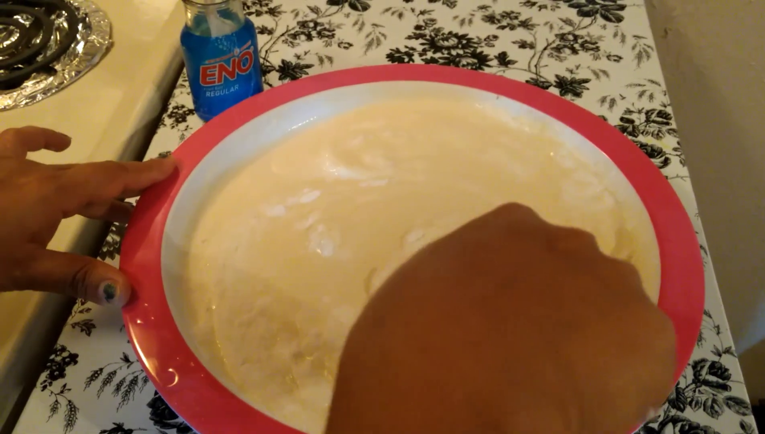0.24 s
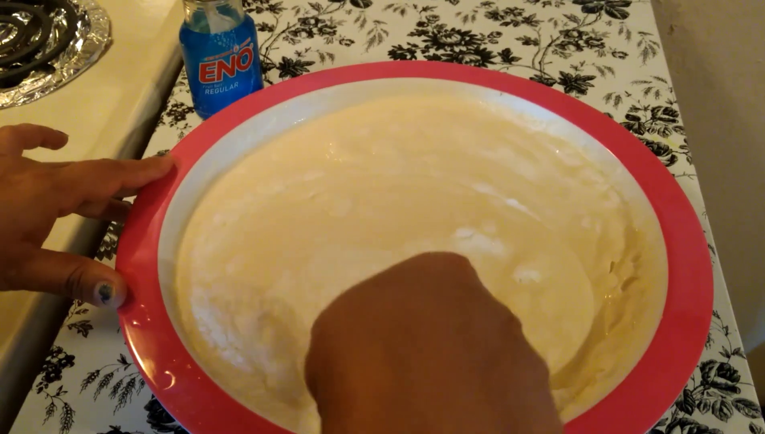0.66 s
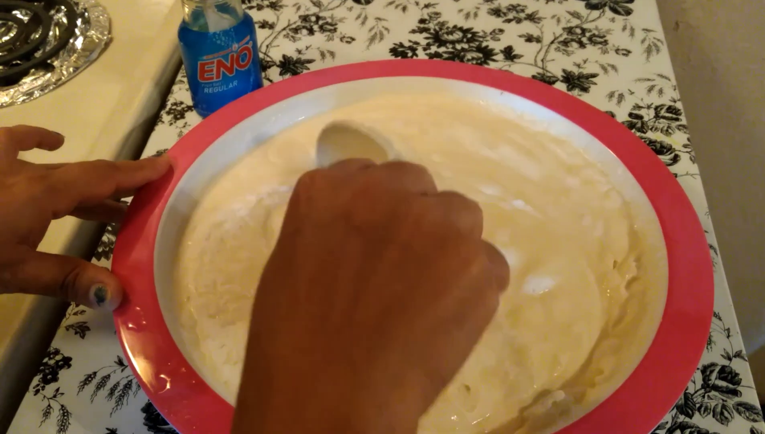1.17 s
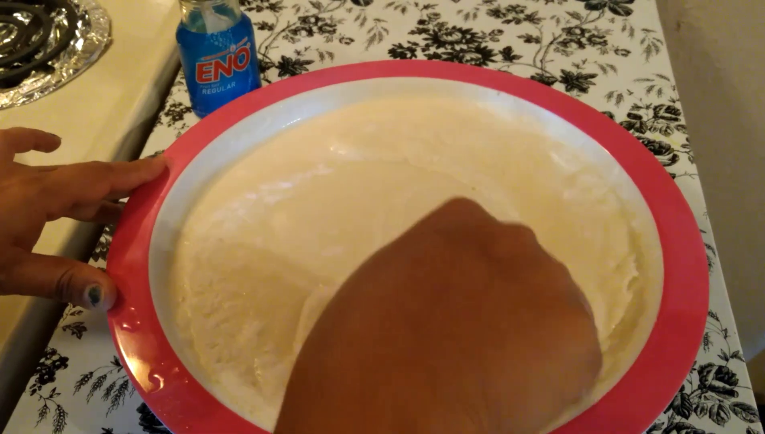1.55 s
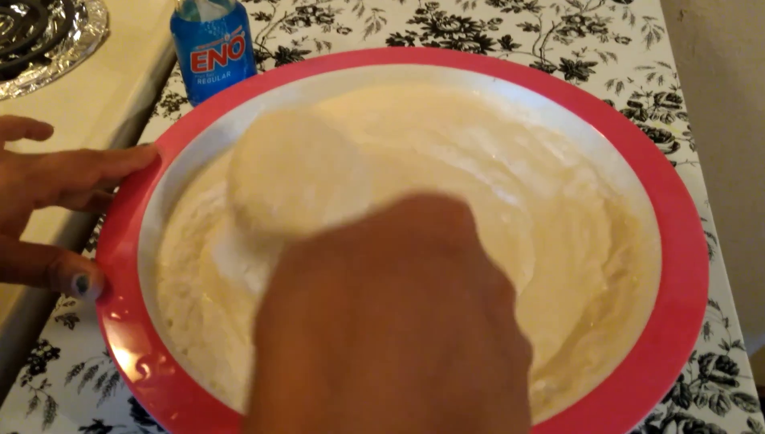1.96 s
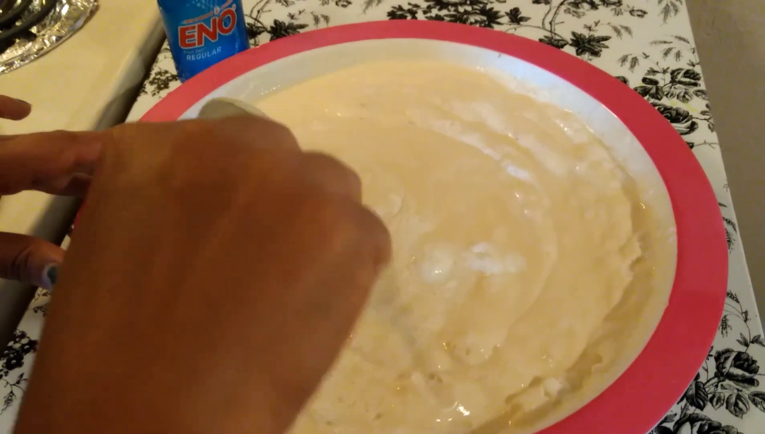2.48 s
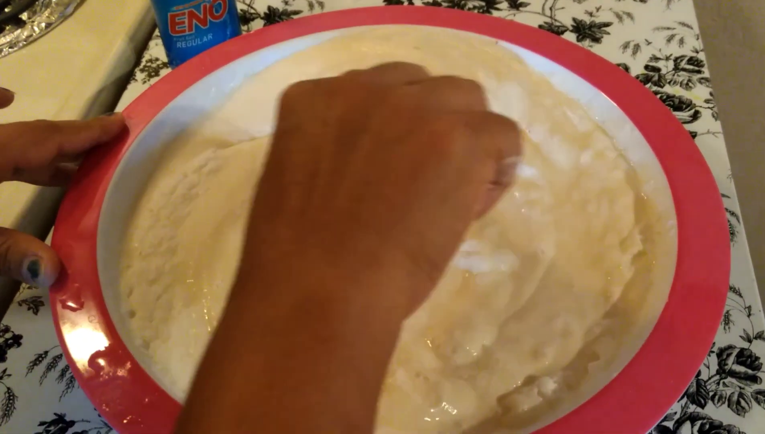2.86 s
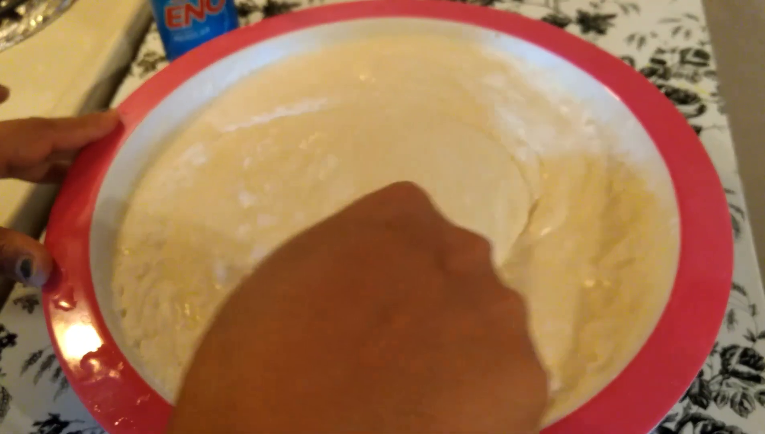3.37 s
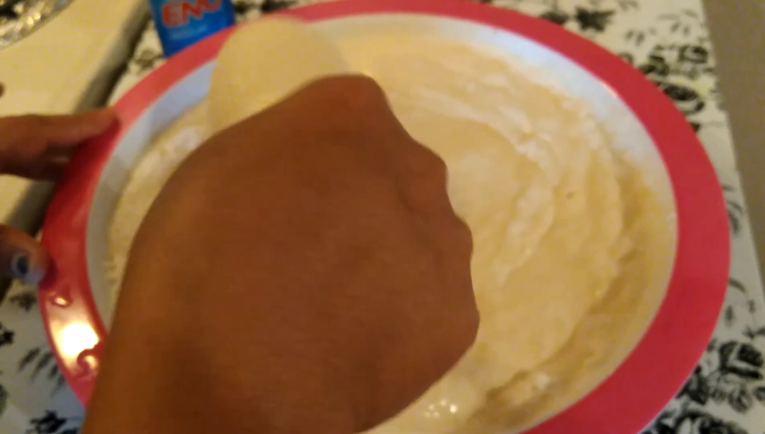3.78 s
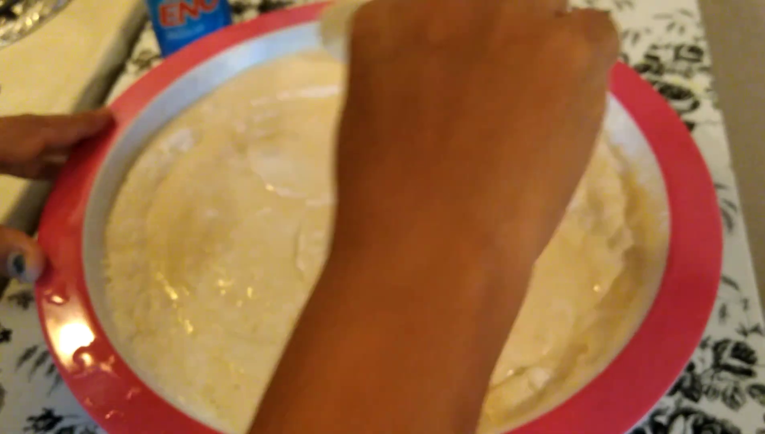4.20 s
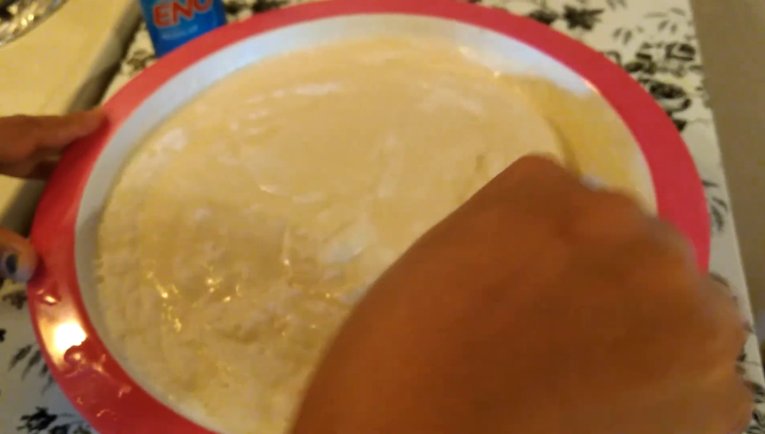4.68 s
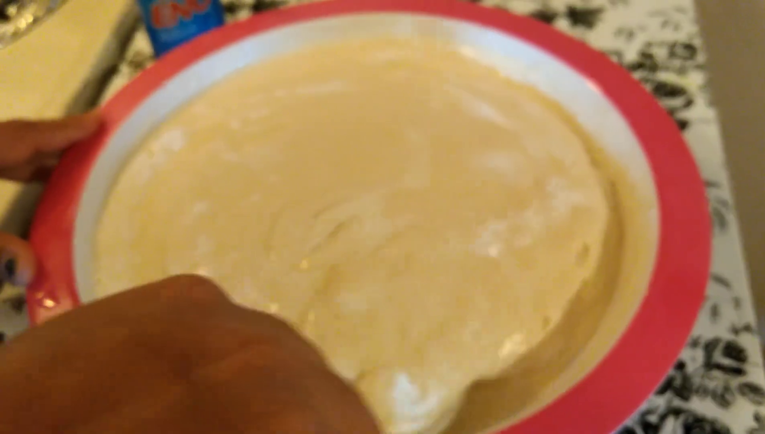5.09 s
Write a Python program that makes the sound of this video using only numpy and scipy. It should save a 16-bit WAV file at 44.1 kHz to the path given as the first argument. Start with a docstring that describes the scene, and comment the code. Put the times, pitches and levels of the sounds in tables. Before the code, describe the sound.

A ladle stirs thick batter in a plastic bowl, close to a stereo microphone in a kitchen. From 0 to 0.6 s a flurry of small dull knocks rides on rough, stuttering scraping and a soft grainy swish. The stroke then fades, leaving faint wet ticks until a firm hollow double thud at about 1.37 s with smaller knocks trailing. A short drag follows around 1.5 to 1.7 s, and a wet smack at 2.16 s. The loudest, quickly damped knock falls at 2.62 s. From 2.8 to 3.4 s the ladle scrapes the wall with a wet rasp and several taps, then it quiets. A moderate knock at 4.33 s begins a softer rubbing stroke with squelchy puffs, and light taps near 5.1 s end it at about 5.3 s. A faint wavering low motor hum and steady soft hiss run throughout.

```python
"""Knocks and drags on a plastic bowl are heard first, as a ladle stirs thick batter close by, in stereo.
Knocks sum short thuds with the damped modes of the bowl; random slips drive the same modes as drag.
Batter swishes as flickering bands of grains and smacks as puffs of noise; scraping adds a wet rasp.
Behind these a motor hums on two wavering lines, over a steady hiss of banded noise."""
import sys
import numpy as np
from scipy import signal
from scipy.fft import rfft, irfft, next_fast_len
from scipy.io import wavfile

SR = 44100
rng = np.random.default_rng(int(sys.argv[2]) if len(sys.argv) > 2 else 0)


def persist_wave(psi):
    """Save psi, clipped to +-1, as 16-bit WAV."""
    counts = np.round(np.clip(psi, -1, 1) * 32767).astype(np.int16)
    wavfile.write(sys.argv[1], SR, np.atleast_2d(counts).T)


N = 235494

# ladle against the bowl: [t/s, level/dB, pitch f/Hz, thud over ring/dB,
#   shudder relative level/dB, pitch of the shudder f/Hz]
LADLE_KNOCKS = [(0.002, -29.5, 550, -3, -4.5, 560), (0.018, -40, 520, -8, -3, 540),
                (0.028, -35, 550, -1, 1, 560), (0.054, -30.5, 520, -3.5, 1.5, 477),
                (0.057, -32, 400, -3, 0, 453), (0.081, -33, 1090, -9, -10, 1000),
                (0.119, -43.5, 1000, 2.5, 1, 900), (0.146, -43, 450, -3, -3, 450),
                (0.156, -47, 1150, -1, -11, 1150), (0.171, -45, 1110, 0, -7, 500),
                (0.186, -44, 1100, -12, 9, 500), (0.214, -43, 1150, 0, -9, 1150),
                (0.235, -44, 1120, -1, -8, 1100), (0.223, -42, 450, -3.5, -7, 450),
                (0.286, -38.5, 1110, -7, -1, 905), (0.309, -34.5, 680, -11, 4, 795),
                (0.328, -37, 610, -3, 1, 650), (0.338, -42, 1150, -1, -11, 1150),
                (0.36, -35, 1110, -2, -6, 1130), (0.3667, -37, 1230, 0, -12, 1090),
                (0.379, -43.5, 1120, 2, -20, 1100), (0.415, -37.5, 1170, -19, 3, 1110),
                (0.494, -37, 1010, -6, 5, 800), (0.555, -36.5, 1050, -3, 2, 816),
                (1.3662, -22, 620, -2.5, -1.5, 504), (1.3677, -18.5, 490, -1, 1.5, 470),
                (1.3663, -35.5, 1150, -6, -8, 1000), (1.3697, -24, 340, -1, -2, 320),
                (1.378, -30, 440, -3, -5, 450), (1.385, -27, 305, -8.5, -9, 300),
                (1.414, -26.5, 437, -3.5, -4, 400), (1.398, -32, 477, -8, -4, 480),
                (1.432, -35, 292, -3, -16, 330), (1.437, -34, 520, -3, -6, 500),
                (1.459, -37, 490, 0, 5.5, 410), (1.474, -40, 276, -4, 2, 307),
                (1.63, -33, 465, -11.5, 2, 403), (1.667, -46, 494, -3, -2, 450),
                (1.9745, -46.5, 1000, 1.5, 0, 650), (2.163, -40, 1220, -16.5, 3, 915),
                (2.622, -15.5, 530, -8.5, -2, 490), (2.625, -24, 261, -6.5, 0.5, 240),
                (2.6219, -29, 1180, -4, 2, 1100), (2.634, -33, 495, -14, -9, 494),
                (2.642, -45, 215, 2, -3, 220), (2.656, -31, 495, -10, -2, 497),
                (2.676, -46, 213, 6.5, 7, 220), (2.706, -43.5, 230, -8, 6, 300),
                (2.794, -39, 796, 0.5, 6, 555), (2.819, -49, 980, 3, -11, 800),
                (2.976, -37, 980, -7.5, -3, 700), (3.0365, -31.5, 590, -3.5, -4.5, 550),
                (3.038, -42, 1000, -6, -13, 1000), (3.128, -45, 605, -6, -5, 600),
                (3.146, -38, 544, -0.5, -19, 500), (3.161, -40, 586, 2, -22, 500),
                (3.183, -49, 480, 3, -15, 450), (3.262, -45, 503, -2, -5, 500),
                (3.279, -41, 533, -1, 2, 500), (3.307, -42.5, 835, 2, -2, 700),
                (3.334, -40.5, 900, 0, 1, 800), (3.3502, -33.5, 960, -6, -4, 900),
                (3.3499, -30.5, 420, -6.5, 2, 394), (3.3515, -38, 2280, 2, -10, 2300),
                (3.704, -55, 980, 3.5, 8, 700), (4.332, -37.5, 1330, -1, -4, 1000),
                (4.334, -29, 805, -7, -2, 880), (4.334, -34, 306, -1.5, 6, 219),
                (4.352, -48, 198, -8, 4, 170), (4.344, -41, 483, -2, -4, 480),
                (4.538, -43.5, 796, -6, 3, 700), (4.778, -47, 1110, -4, -4, 900),
                (5.093, -39.5, 1100, -4, 0.5, 820), (5.0935, -39, 2170, -1, -3, 2300),
                (5.0985, -49, 900, -2, -10, 900), (5.178, -49, 1090, 7.5, 5.5, 910),
                (5.179, -44, 484, -2.5, -8, 500)]
FIRM_KNOCK_DB = -30   # reference level for what changes with firmness


def bowl(drag_db, drag_hz, bright_db):
    """Modal superposition: knocks, the shudder after each and the slipping drag drive the same modes."""
    # bowl loaded with batter: [f/Hz, relative level/dB, t60/s]
    modes = [(147, -11, 0.19), (202, -9, 0.1), (247.4, -3.5, 0.11), (322.4, -2.5, 0.07),
             (380, -15.5, 0.047), (457, -11.5, 0.089), (499, -5, 0.084), (541, -8.5, 0.027),
             (595, -5.5, 0.039), (688, -7.5, 0.049), (786, -4, 0.035), (943.6, -4.5, 0.053),
             (1023, -0.5, 0.028), (1149, -0.5, 0.037), (1388, -0.5, 0.023), (1570, 0.5, 0.011),
             (1950, 2, 0.013), (2070, -11, 0.076), (2393, -3, 0.039)]
    # side signal against middle signal: [f/Hz, level/dB]
    side_to_middle = [(200, -3.5), (500, -10.5), (700, -4.5), (1050, -24), (1500, 1.5), (2300, -13)]
    contact_cycles = 0.34   # t60 of the contact, in cycles of the mode
    knock_octaves, shudder_octaves, drag_octaves = 0.8, 0.88, 0.82   # spread over the modes
    narrowing_per_db = 0.02   # octaves of spread lost by a firmer knock
    ring_db, knock_tilt_db = -19, 3.5   # relative level; tilt per octave
    shudder_level_db, shudder_t60_s, low_linger = -42, 0.21, 0.27   # t60 at 500 Hz; low modes last longer
    burst_hz, burst_db, patchy_db = 35, 1.8, 2.5   # the drag sticks and slips in bursts

    t = np.arange(SR // 2) / SR
    chance = rng.normal(0, 1, (len(LADLE_KNOCKS), len(modes), 2))
    shared_slips = grains(600, spread_db=2.0)
    out = thuds() * np.array([[1], [.08]])   # rows: middle, side
    bursts_db = burst_db * drift(burst_hz)
    for m, (hz, mode_db, t60) in enumerate(modes):
        blows, shudder = np.zeros((2, N)), np.zeros(N)
        width = from_db(at_hz(side_to_middle, hz))
        for k, (s, knock_db, centre_hz, _, shudder_db, shudder_hz) in enumerate(LADLE_KNOCKS):
            i = round((s + 0.64 / hz) * SR)   # low modes answer later
            narrowing = narrowing_per_db * (knock_db - FIRM_KNOCK_DB)
            share_db = favour_db(hz, centre_hz, knock_octaves - narrowing)
            share_db += knock_tilt_db * np.log2(hz / centre_hz)
            size = from_db(knock_db + share_db + mode_db + 1.5 * chance[k, m, 0] + ring_db)
            blows[:, i] += size * np.array([(-1) ** m, width * chance[k, m, 1]])

            n = min(N - i, len(t))
            fall_db = -60 * t[:n] / shudder_t60_s * (hz / 500) ** low_linger
            start_db = knock_db + shudder_db + shudder_level_db
            start_db += favour_db(hz, shudder_hz, shudder_octaves - narrowing)
            shudder[i:i + n] += from_db(start_db + mode_db + fall_db)

        share_db = favour_db(hz, drag_hz, drag_octaves) + bright_db * np.log2(hz / drag_hz)
        drag = from_db(drag_db + share_db + mode_db - 32.5 + bursts_db + patchy_db * drift(13.4))
        # each mode mixes slips of its own with the shared ones
        slips = 0.9 * grains(900, spread_db=2.5) + 0.35 * shared_slips
        middle = drag * slips + shudder * grains(2000, spread_db=0.5)
        side = width * (shudder + drag) * np.roll(slips, 3000)
        force = blows + np.array([middle, side])
        # a soft contact: the ring swells first
        out += ring(force, hz, t60) - ring(force, hz, contact_cycles / hz)
    # a small bowl radiates no deep bass
    out = signal.sosfilt(signal.butter(4, 125, "high", fs=SR, output="sos"), out)
    return np.array([out[0] + out[1], out[0] - out[1]])


def favour_db(hz, centre_hz, octaves):
    """Modal participation: the place of contact favours modes along a bell on a log-frequency axis."""
    return -6 * (np.log2(hz / centre_hz) / octaves) ** 2


def thuds():
    """Impact excitation: each blow itself, with a brighter snap that grows with firmness."""
    snap_ratio, snap_firm_db, snap_per_db = 1.89, -20, 0.65
    out = np.zeros(N + 1500)
    for s, knock_db, hz, hard_db, *_ in LADLE_KNOCKS:
        snap_db = snap_firm_db + snap_per_db * (knock_db - FIRM_KNOCK_DB)
        blow = thud(hz, 1.06) + from_db(snap_db) * thud(snap_ratio * hz, 2.1)
        out[round((s + .001) * SR):][:1500] += from_db(knock_db + hard_db) * blow
    return out[:N]


def thud(hz, cycles_to_peak):
    """Heavy damping: cycles swell, sink in pitch and die as the batter damps the wall."""
    cycles = hz * np.arange(1500) / SR
    swell = (cycles / cycles_to_peak * np.exp(1 - cycles / cycles_to_peak)) ** 2
    sinking_cycles = cycles * 0.848 + 0.76 * (1 - np.exp(-cycles / 4.02))
    return swell * np.sin(2 * np.pi * sinking_cycles)


def scraping():
    """Sliding contact: each scrape rises, holds and falls; gives touch (0-1) and size of the rasp."""
    # edge along the wall: [t of full touch/s, length of the hold/s, wet rasp level/dB]
    scrapes = [(0.0, 0.25, -63.5), (1.62, 0.044, -70), (3.148, 0.22, -61), (4.526, 0.41, -61)]
    rise_s, fall_s = 0.2, 0.22
    t = np.arange(N) / SR
    shapes = []
    for s, length, _ in scrapes:
        rise = 1 + (t - s) / rise_s
        fall = 1 - (t - s - length) / fall_s
        shapes.append(np.clip(np.minimum(rise, fall), 0, 1))
    shapes = np.array(shapes)
    return shapes.max(axis=0), from_db(np.array(scrapes)[:, -1]) @ shapes ** 2


def rasp(size):
    """Resonant friction noise: dense random clicks ring one short, patchy resonance."""
    rasp_hz, t60_s, patchy_db = 2050, 0.0033, 1.2
    rough = rms_one(ring(grains(2500, spread_db=4.5), rasp_hz, t60_s))
    return size * from_db(patchy_db * drift(6)) * rough


def swish(level_db):
    """Granular noise: dense clicks in flickering bands follow the level of the stroke."""
    # swish of the batter: [f/Hz, relative level per Hz/dB]
    swish_spectrum = [(40, 1), (70, 8), (150, 7.5), (300, 4.5), (800, -2.5), (1500, -1.5), (2500, -3.5),
                      (4000, 0), (6000, -5), (8000, -5), (10000, -16.5), (15000, -13.5)]
    froth = np.reshape([grains(6000, spread_db=1.0) for k in range(4)], (2, 2, N))
    return from_db(level_db + 5) * banded(froth, swish_spectrum, patchy_db=1.93, bright_db=-0.46)


def smacks():
    """Band-passed noise bursts: short puffs, each around its own pitch, open with a crack and decay."""
    # wet smacks of the batter: [t/s, level/dB, centre f/Hz, t60/s]
    puff_list = [(0.055, -55, 2380, 0.039), (0.081, -55, 2060, 0.035), (0.415, -54, 2620, 0.083),
                 (0.4953, -64, 4030, 0.027), (0.662, -55.5, 5100, 0.025), (1.1155, -53, 6700, 0.033),
                 (1.494, -59, 2430, 0.37), (1.6507, -53, 3830, 0.13), (2.1626, -52, 3520, 0.13),
                 (2.1637, -54.5, 6900, 0.1), (2.1625, -64, 13000, 0.03), (2.624, -69, 2550, 0.18),
                 (2.6776, -50.5, 4360, 0.062), (2.795, -53, 3070, 0.14), (3.3504, -52, 2170, 0.074),
                 (3.352, -52.5, 4800, 0.05), (3.58, -52.5, 5000, 0.014), (4.331, -59, 2530, 0.11),
                 (4.555, -55, 2480, 0.083), (4.667, -53, 2220, 0.062), (4.7441, -53, 4590, 0.064),
                 (4.78, -54.5, 2740, 0.035), (4.8498, -50, 4100, 0.15), (5.0967, -52.5, 2300, 0.1)]
    octaves, crack_db, crack_t60_s = 1.21, -5.5, 0.0036
    out, t = np.zeros(N + 8000), np.arange(8000) / SR
    reach = 2 ** (octaves / 2)
    crack = from_db(crack_db - 60 * t / crack_t60_s)
    attack = np.minimum(t / 0.00047, 1)
    for s, smack_db, hz, t60 in puff_list:
        band = signal.butter(2, [hz / reach, min(hz * reach, 16000)], "band", fs=SR, output="sos")
        puff = rms_one(signal.sosfilt(band, rng.standard_normal(8000)))
        fall = from_db(smack_db) * (from_db(-60 * t / t60) + crack) * attack
        out[round(s * SR):][:8000] += fall * puff
    return out[:N]


def hum():
    """Harmonic synthesis: two fluttering motor lines share an unsteady speed, out of step between sides."""
    # motor lines: [multiple of the fundamental, relative level/dB]
    lines = [(1, 2), (2, -2.5)]
    # course of the hum: [t/s, level/dB]
    course = [(0.0, -70), (0.36, -67), (0.98, -76.5), (1.75, -67.5), (1.95, -68), (2.11, -70), (2.36, -69),
              (2.83, -67), (3.32, -70), (4.09, -73), (4.73, -71.5), (5.34, -73)]
    hum_hz, waver_hz, turn_rad, flutter_db = 120.5, 1.34, 0.87, 3.0
    phase = 2 * np.pi * np.cumsum(hum_hz + waver_hz * drift(3.47)) / SR
    turn = turn_rad * np.array([[-.5], [.5]])
    level_db = np.interp(np.arange(N) / SR, *np.transpose(course))
    out = np.zeros((2, N))
    for k, line_db in lines:
        gain = from_db(level_db + line_db + flutter_db * drift(6.8))
        out += gain * np.sqrt(2) * np.sin(k * phase + turn)
    return out


def hiss():
    """Coloured Gaussian noise: flickering bands at one overall level."""
    # steady hiss: [f/Hz, relative level per Hz/dB]
    hiss_spectrum = [(30, -18), (60, 9.5), (78, 9), (100, 10.5), (115, 16), (135, 15), (170, 10.5),
                     (300, 8.5), (600, 1.5), (1200, -3), (2500, -8), (5000, -10), (8000, -11),
                     (10000, -15.5), (15000, -15.5)]
    white = rng.standard_normal((2, 2, N))
    return from_db(-60.5) * banded(white, hiss_spectrum, patchy_db=2.5, bright_db=0.5)


def banded(whites, spectrum, patchy_db, bright_db):
    """Filter-bank shaping: half-octave stereo bands with level, flicker, tilt and likeness; rms 1."""
    # left-right likeness of the noise: [f/Hz, correlation]
    likeness = [(40, .9), (200, .35), (300, .5), (470, .25), (700, .65), (950, .97), (1350, .75),
                (1900, .7), (2700, .9), (3500, .985), (12000, .97)]
    smooth_above_hz = 3400   # the flicker fades in the treble
    out, together = 0, drift(7)
    edges = 25 * 2 ** np.arange(0, 9.6, .5)
    for k, (low, high) in enumerate(zip(edges, edges[1:])):
        band = signal.butter(2, [low, high], "band", fs=SR, output="sos")
        mid, side = signal.sosfilt(band, whites[k % 2])   # neighbouring bands get unrelated noise
        hz = np.sqrt(low * high)
        alike = at_hz(likeness, hz)
        depth_db = patchy_db * min(1, (smooth_above_hz / hz) ** 0.44)
        flicker_db = depth_db * (1.12 * together + 0.86 * drift(10.0))
        gain = from_db(at_hz(spectrum, hz) + flicker_db + bright_db * np.log2(hz / 4000))
        out = out + gain * (np.sqrt(1 + alike) * mid + np.sqrt(1 - alike) * side * [[1], [-1]])
    return rms_one(out)


def widened(x, sides):
    """Stereo widening: a fixed filter turns the left by the table; in the treble, late and upside down."""
    treble_lag_s = .00056
    size = next_fast_len(N + 2048)
    hz = np.maximum(np.fft.rfftfreq(size, 1 / SR), 1)
    points_hz, level_db, turn = np.transpose(sides)
    lagged = np.pi - 2 * np.pi * hz * treble_lag_s
    phase = np.where(hz < points_hz[-1], np.interp(hz, points_hz, turn), lagged)
    half = from_db(np.interp(hz, points_hz, level_db) / 2)   # each side takes half the level difference
    return irfft(rfft(x, size) * [half * np.exp(1j * phase), 1 / half], size)[:, :N]


def ring(clicks, hz, t60):
    """Damped resonator: a unit click sets a decaying sine of starting height 1 ringing."""
    r, w = from_db(-60 / (t60 * SR)), 2 * np.pi * hz / SR
    return signal.lfilter([0, np.sin(w)], [1, -2 * r * np.cos(w), r * r], clicks + 1e-18)


def grains(per_s, spread_db):
    """Random impulse train: clicks of uneven size and either sign, rms 1."""
    sizes = from_db(spread_db * np.minimum(rng.exponential(1, N), 5)) * rng.choice([-1, 1], N)
    return rms_one(sizes * (rng.random(N) < per_s / SR))


def drift(rate):
    """Low-passed noise: slow chance of spread 1, from two equal poles at the rate in Hz."""
    r = np.exp(-80 * np.pi * rate / SR)   # one step every 40 samples
    white = rng.standard_normal(N // 40 + 2002)
    slow = signal.lfilter([1], [1, -2 * r, r * r], white)[2000:]   # the filter settles first
    return np.interp(np.arange(N) / 40, np.arange(len(slow)), rms_one(slow))


def from_db(db):
    """Decibel law: the amplitude gain of a level."""
    return 10 ** (np.asarray(db) / 20)


def rms_one(x):
    """Power normalisation: scaled to unit rms."""
    return x / np.sqrt(np.mean(x ** 2) + 1e-20)


def at_hz(points, hz):
    """Log-frequency interpolation: a spectrum table read at a frequency."""
    points_hz, values = np.array(points)[:, 0], np.array(points)[:, 1]
    return np.interp(np.log(hz), np.log(points_hz), values)


def scene():
    """Superposition: the bowl and the sounds in the air reach the two sides each in their own way."""
    # stirring ladle: [t/s, relative drag level/dB, pitch of the drag f/Hz, relative swish level/dB]
    stroke = [(0.0, -33.5, 557, -61), (0.1, -42.5, 596, -61), (0.135, -58, 650, -61),
              (0.16, -39.5, 630, -62.5), (0.235, -45.5, 736, -57.5), (0.26, -43, 600, -61.5),
              (0.3, -47.5, 700, -62), (0.33, -46, 800, -62.5), (0.385, -50, 900, -62),
              (0.405, -47, 770, -60), (0.55, -73, 700, -60), (0.8, -64.5, 620, -68),
              (1.01, -100, 626, -74.5), (1.4, -90, 626, -69.5), (1.53, -46, 555, -65.5),
              (1.87, -71, 630, -61), (2.29, -57, 597, -64.5), (2.62, -60.5, 620, -64.5),
              (2.83, -52, 626, -60.5), (3.01, -47.5, 590, -61), (3.07, -41.5, 770, -62.5),
              (3.11, -45, 700, -63.5), (3.14, -39, 700, -65), (3.19, -43, 650, -63.5),
              (3.245, -47, 570, -61), (3.3, -44, 696, -60.5), (3.345, -48, 690, -60.5),
              (3.39, -55, 560, -64), (3.85, -75, 550, -73), (4.16, -100, 626, -80), (4.34, -69, 500, -75),
              (4.42, -49, 550, -67), (4.52, -53.5, 714, -63), (4.65, -50, 890, -62.5), (4.8, -60, 704, -64),
              (5.03, -54, 626, -67), (5.34, -86, 626, -71.5)]
    # left against right for the bowl, below the treble: [f/Hz, level/dB, phase/rad]
    bowl_sides = [(130, 0, -1), (220, -1, -.4), (300, 1.5, -.45), (470, .5, 0), (560, 2.5, .3),
                  (700, 3.5, -.1), (820, 2, -.4), (1050, 0, -.6), (1300, -2, -.65), (1500, -3.5, -1.2),
                  (1800, -1, -3.5), (2200, 0, -4.6)]
    # left against right for sounds in the air, below the treble: [f/Hz, level/dB, phase/rad]
    air_sides = [(60, 0, -3.1), (300, 0, -2.45), (560, 0, -1.2), (800, 0, -.7), (1100, 0, -.65),
                 (1500, -1, -1.2), (1800, -1, -3.6), (2200, 0, -4.6)]
    s, *columns = np.transpose(stroke)
    drag_db, drag_hz, swish_db = [np.interp(np.arange(N) / SR, s, c) for c in columns]
    touch, rasp_size = scraping()
    bright_db = -3.5 + 2 * touch   # dB per octave: a scrape brightens the drag
    body = widened(bowl(drag_db, drag_hz, bright_db), bowl_sides)
    air = swish(swish_db) + rasp(rasp_size) + smacks() + hiss()
    return body + hum() + widened(air, air_sides)


def record(dry):
    """Band limitation: the microphone is weak in deep bass, the top is cut, the converter sits off zero."""
    cutoff_hz, offset = 15450, -.0001
    thin = signal.sosfilt(signal.butter(2, 45, "high", fs=SR, output="sos"), dry)
    return signal.sosfilt(signal.ellip(12, .3, 60, cutoff_hz, fs=SR, output="sos"), thin) + offset


dry = scene()
out = record(dry)
persist_wave(out)
```